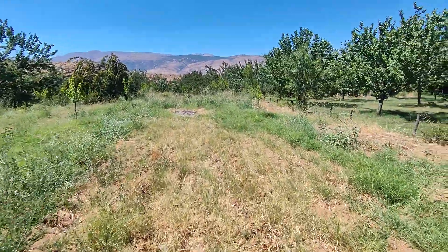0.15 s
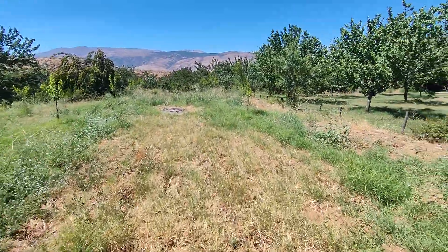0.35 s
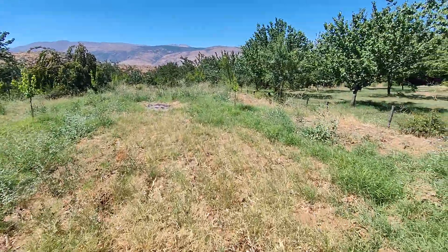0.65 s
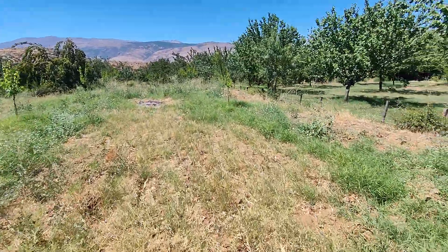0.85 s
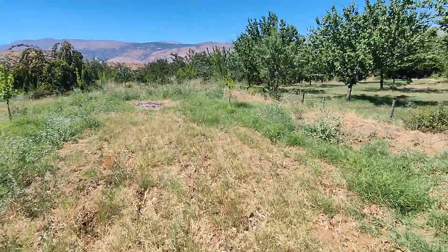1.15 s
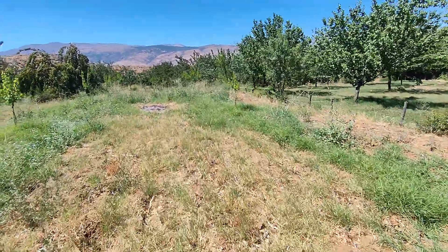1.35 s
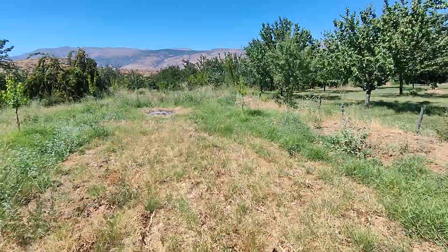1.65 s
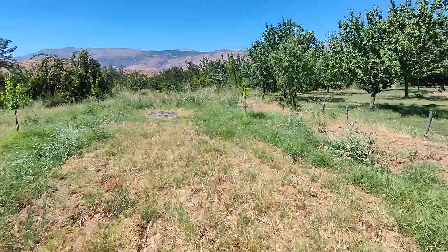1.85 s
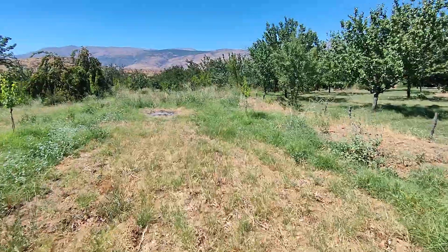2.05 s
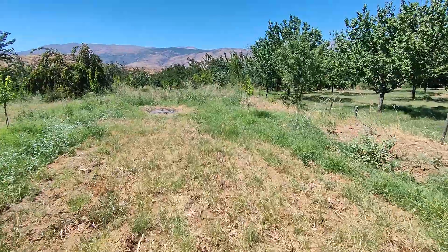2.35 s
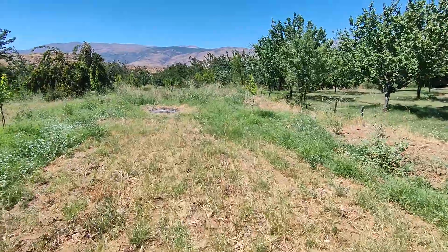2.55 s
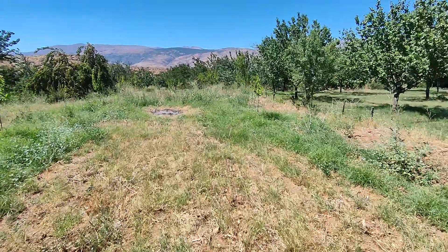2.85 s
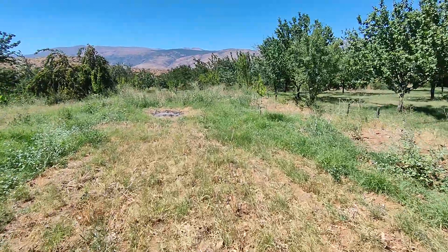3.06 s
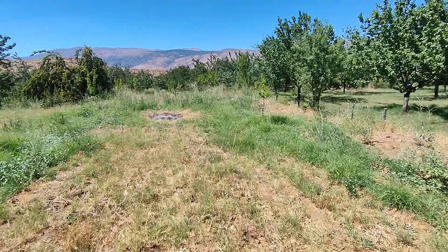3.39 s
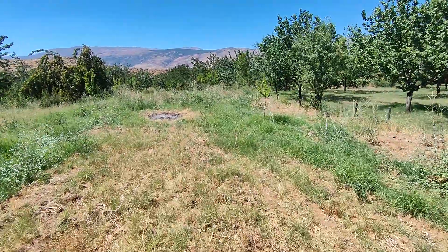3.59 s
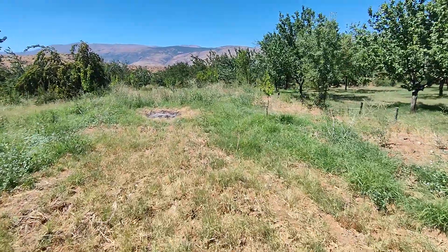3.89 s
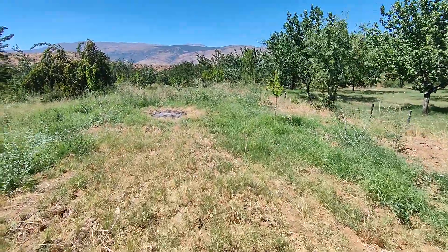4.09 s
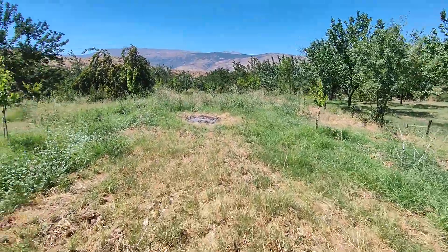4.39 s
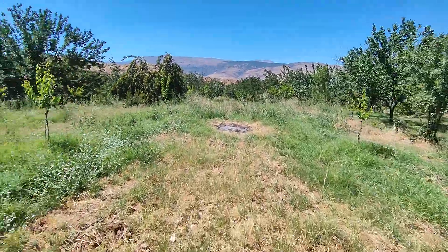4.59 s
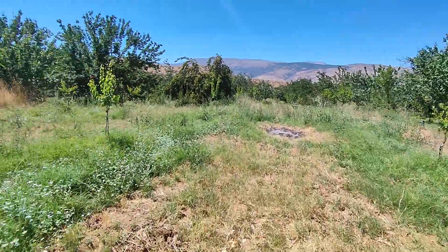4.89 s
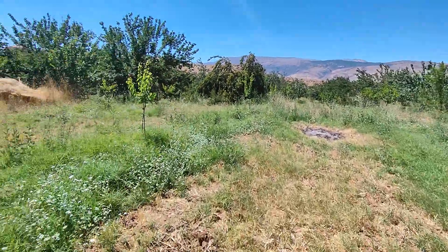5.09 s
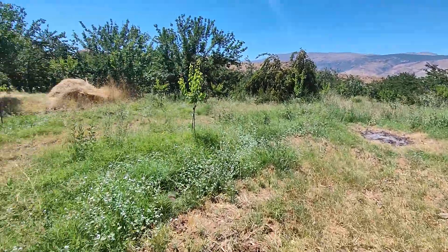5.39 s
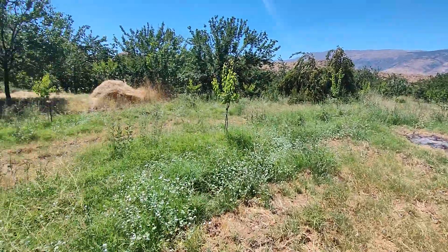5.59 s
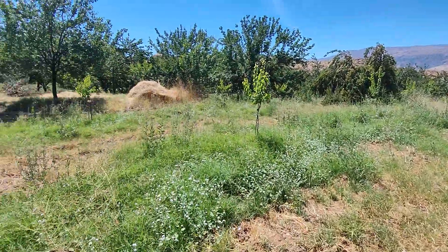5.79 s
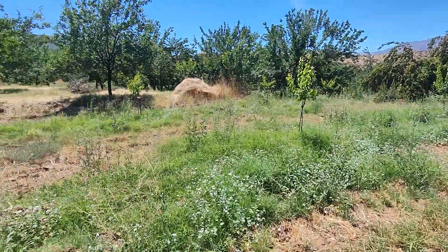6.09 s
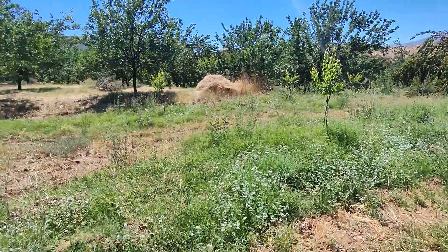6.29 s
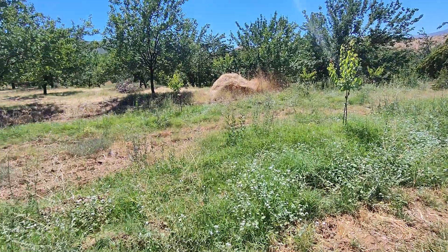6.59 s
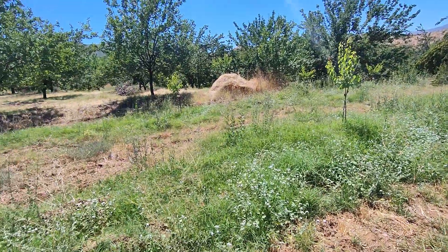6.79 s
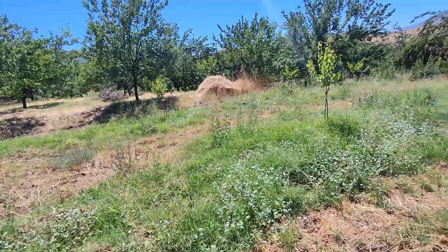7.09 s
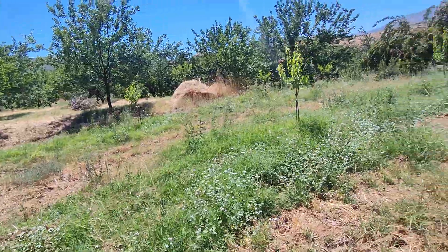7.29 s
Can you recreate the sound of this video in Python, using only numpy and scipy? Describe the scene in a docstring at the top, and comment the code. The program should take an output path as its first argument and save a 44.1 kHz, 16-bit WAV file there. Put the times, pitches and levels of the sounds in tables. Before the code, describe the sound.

Cicadas shrill densely across a summer orchard while slow steps crunch softly over dry mown grass and light breeze thumps the microphone, then walking stops.

```python
"""Cicadas shrill all around a summer orchard: fast click trains, smeared by leaves and rung by small bodies.
The nearer ones chirp about twelve times a second, drifting in and out of step.
Someone carrying a phone walks slowly over mown dry grass and stops; crowds of cracks make the steps,
damped swings the snapping stalks. A light breeze bumps the two microphone ports as low filtered noise,
over a faint open-air hush of noise, a faint wavering hum and one brief hollow tone gliding down."""
import sys
import numpy as np
from scipy import signal
from scipy.fft import rfft, irfft, next_fast_len
from scipy.io import wavfile
from scipy.ndimage import uniform_filter1d, map_coordinates

SR = 44100
rng = np.random.default_rng(int(sys.argv[2]) if len(sys.argv) > 2 else 0)


def wrap_up_sound(samples):
    """Save the sound to the file named by the first command line argument, as 16-bit audio."""
    columns = np.atleast_2d(samples).T
    # keep every value between -1 and 1, then stretch to whole-number steps
    tamed = np.clip(columns, -1, 1)
    steps = np.round(tamed * 32767).astype(np.int16)
    wavfile.write(sys.argv[1], SR, steps)


N = 328545
TIME = np.arange(N) / SR
TURN_S, TURN_LENGTH_S = 5.44, 0.9  # the walker slows, turns left and comes to rest


def undb(db):
    """Decibels to gain."""
    return 10 ** (np.asarray(db) / 20)


def unit(x):
    """Scale to an rms of one."""
    return x / np.sqrt(np.mean(x ** 2))


def pan(left_minus_right_db):
    """Gains of the two ports, as a column."""
    return undb(np.array([[left_minus_right_db], [-left_minus_right_db]]) / 2)


def colour(x, points):
    """Filter by a spectrum of (frequency [Hz], gain [dB]) points, straight over log frequency."""
    hz, db = np.transpose(points)
    size = next_fast_len(N)
    bin_hz = np.maximum(np.arange(size // 2 + 1) * SR / size, 1)
    gain = undb(np.interp(np.log(bin_hz), np.log(hz), db))
    return irfft(rfft(x, size) * gain, size)[..., :N]


def band(x, lo_hz, hi_hz, order=2):
    """Band-pass."""
    edges_hz = [lo_hz, min(hi_hz, SR / 2 - 1)]
    return signal.sosfilt(signal.butter(order, edges_hz, "band", fs=SR, output="sos"), x)


def walk(rate_hz):
    """Smooth random wander, rms one, from `rate_hz` random knots a second."""
    knots = rng.standard_normal(int(N / SR * rate_hz) + 2)
    line = np.interp(TIME * rate_hz, np.arange(len(knots)), knots)
    return unit(uniform_filter1d(line, int(SR / rate_hz / 2) + 1))


def swell(peak_s, length_s):
    """Smooth rise and fall around a moment; `length_s` is the width at half height."""
    return np.exp2(-(2 * (TIME - peak_s) / length_s) ** 2)


def turned():
    """Zero while walking ahead, one after turning and stopping."""
    return np.clip((TIME - TURN_S) / TURN_LENGTH_S + 0.5, 0, 1)


def cicada(click_hz, jitter, scatter_s):
    """Tymbal ribs buckle in a fast uneven train; moving leaves smear each click, differently at each port."""
    phase = np.cumsum(click_hz * (1 + jitter * walk(150))) / SR
    clicks = np.diff(np.floor(phase), prepend=0) ** 2
    already_singing = [click_hz * scatter_s / 2]
    decay = np.exp(-2 / (scatter_s * SR))
    energy, _ = signal.lfilter([1], [1, -decay], clicks + 1e-18, zi=already_singing)
    return unit(np.sqrt(energy) * rng.standard_normal((2, N)))


CHIRP_HZ = 12.25  # nearer cicadas, before drift
# bouts of chirping in step: (strongest chirp [s], length [s], throb depth [0-1])
STEP_BOUTS = [(0.568, .9, .5), (1.973, .4, 0.7), (2.51, .3, 0.6), (2.982, 0.39, 0.7), (4.708, .35, 0.93),
              (5.489, .8, 0.5), (6.817, .45, .55)]


def throb(stray, loose):
    """One cicada's chirping: loosely on its own beat, deeply on the shared beat during a bout."""
    drift = stray * walk(1.65)
    own_cycles = CHIRP_HZ * TIME + rng.random() + 0.5 * walk(1.5)
    power = 1 + loose * np.cos(2 * np.pi * own_cycles)
    for s, length_s, depth in STEP_BOUTS:
        shared_cycles = CHIRP_HZ * (TIME - s) + drift
        power = power + depth * swell(s, length_s) * np.cos(2 * np.pi * shared_cycles)
    return np.sqrt(np.maximum(power, 0))


def shimmer(x, width_hz=130, rate_hz=40, depth_db=1.3):
    """Paths through stirring foliage add and cancel, so narrow bands of the song flicker on their own."""
    f, t, z = signal.stft(x, SR, nperseg=512)
    chance = rng.standard_normal((2, int(f[-1] / width_hz) + 2, int(t[-1] * rate_hz) + 2))
    grid = np.meshgrid(f / width_hz, t * rate_hz, indexing="ij")
    flicker = np.array([map_coordinates(c, grid, order=1) for c in chance])
    return signal.istft(z * undb(depth_db * unit(flicker)), SR)[1][:, :N]


CHORUS_DB, TURNED_DB = -27, -0.55  # rms of the port mean; change once turned away
# relative song spectrum at the ports: (frequency [Hz], left [dB], right [dB])
SONG_SPECTRUM = [(2980, -40, -38.5), (3503, -34.5, -30), (3890, -25.8, -20), (4430, -14, -6),
                 (5060, -11.5, -3.5), (5730, -5, 0), (6610, -6.5, -6), (7200, -7.5, -6.5),
                 (7870, -12, -7.5), (8350, -12, -10.5), (9200, -15.5, -20.5), (11800, -14.5, -16.5),
                 (13070, -15.5, -19), (15500, -31.5, -32)]


def chorus(count=6, click_hz=400, low_hz=4400, high_hz=7200, loose=0.16, far_db=-3, stray=0.049,
           flutter_db=1.2):
    """Near cicadas throb together, each on its own body pitch; far ones blur into a wash."""
    near, far = 0, 0
    body_shape = [(0.65, -25), (0.82, 0.5), (1.2, -5.5), (1.5, -22)]  # (ratio to body_hz, [dB])
    for body_hz in np.geomspace(low_hz, high_hz, count):
        rasp = cicada(click_hz * rng.uniform(0.6, 1.4), 0.1, 0.0024)
        # the pumping abdomen swells notes near its resonance, leaves the bright edge steady
        body = colour(rasp, [(body_hz * ratio, db) for ratio, db in body_shape])
        chirps = throb(stray, loose)
        # fluttering leaves shade each port differently
        shade = undb(np.array([flutter_db * walk(70) for _ in range(2)]))
        near = near + rasp - body + body * unit(chirps * shade)
        far = far + cicada(click_hz * rng.uniform(0.6, 1.6), 0.2, 0.021)
    voices = shimmer(unit(near) + undb(far_db) * unit(far))
    spectrum = np.array(SONG_SPECTRUM)
    song = np.array([colour(voices[k], spectrum[:, [0, k + 1]]) for k in range(2)])
    # such small bodies radiate almost nothing low down
    song = signal.sosfilt(signal.butter(4, 2700, "high", fs=SR, output="sos"), song)
    return song / np.std(song.mean(axis=0)) * undb(CHORUS_DB + TURNED_DB * turned())


# relative density of the open-air hush: (frequency [Hz], density [dB per Hz])
HUSH_SPECTRUM = [(25, 0), (100, -13), (300, -10.5), (700, -13), (1500, -17), (3000, -19.5), (6000, -24)]


def hush(start_db=-55.0, end_db=-57):
    """Far air and foliage: partly shared noise, settling as the breeze drops."""
    air = rng.standard_normal((3, N))
    level = undb(np.linspace(start_db, end_db, N))
    return unit(colour(0.5 * air[0] + air[1:], HUSH_SPECTRUM)) * level * pan(-6.0)


def hum(centre_hz=420, waver=0.05, start_db=-67, fade_db_per_s=2):
    """A faint sine, wavering in pitch and level while it steadily fades."""
    phase = 2 * np.pi * np.cumsum(centre_hz * (1 + waver * walk(14))) / SR
    return np.sin(phase) * undb(start_db - fade_db_per_s * TIME + 3.5 * walk(9))


DRAUGHT_WALKING_DB, DRAUGHT_RESTING_DB = (-51, -54.5), (-56.5, -71)  # (left, right)
# gusts: (peak [s], length [s], level over both ports [dB], left minus right [dB])
GUST_TABLE = [(.01, .1, -40, -14), (0.134, .1, -35.5, 4), (0.278, 0.18, -33.5, -10), (0.582, .18, -42, 8),
              (0.874, 0.15, -38, 13), (1.28, 0.23, -48, -12), (1.54, 0.14, -38.5, 20),
              (1.825, 0.35, -41.5, 20), (2.2, 0.17, -41, 4), (2.43, 0.11, -37, -8),
              (2.577, 0.053, -38, -10), (3.215, 0.13, -43, 14), (3.69, 0.24, -35.5, 20),
              (4.0, 0.074, -33.5, 15), (4.196, .14, -37, 1.5), (4.42, 0.1, -36.5, 9),
              (4.73, 0.18, -36.5, 8), (5.132, .08, -47, 7), (5.342, 0.11, -44, 16), (6.62, 0.19, -48.5, 20)]


def wind_strength():
    """Wind on each port: a draught that drops when the walker stops, and gusts from either side."""
    draughts = zip(DRAUGHT_WALKING_DB, DRAUGHT_RESTING_DB)
    power = np.array([undb(moving + (still - moving) * turned()) ** 2 for moving, still in draughts])
    for s, length_s, db, left_minus_right_db in GUST_TABLE:
        sides = pan(left_minus_right_db)
        power = power + (undb(db) * sides / np.linalg.norm(sides)) ** 2 * swell(s, length_s)
    return np.sqrt(power)


# single eddies on the windward port: (time [s], peak [dB], pitch [Hz])
EDDY_THUMPS = [(0.169, -23, 115), (0.614, -25, 119), (0.867, -28, 104), (1.925, -28.5, 107),
               (2.578, -29, 130), (3.215, -24.5, 135), (3.64, -24, 116), (3.694, -24.5, 90),
               (3.7288, -13.5, 148), (3.7721, -11, 168), (3.984, -26.5, 110), (4.377, -28, 120),
               (4.424, -15, 128), (5.309, -29.5, 79.4)]


def breeze(gust_db=5.0, eddy_db=3, gust_s=0.27):
    """Turbulence rumbles in lumps on each port separately; some eddies land as single soft thumps."""
    # (frequency [Hz], gain [dB])
    rumble = [(15, -3.5), (35, 4), (115, 0), (200, -17), (320, -28.5), (600, -37), (2000, -68)]
    lumps = np.array([colour(rng.standard_normal(N), rumble)
                      * undb(gust_db * walk(20) + eddy_db * walk(60)) for _ in range(2)])
    strength = wind_strength()
    # the lumps share out the strength of each gust
    running_rms = np.sqrt(uniform_filter1d(lumps ** 2, int(gust_s * SR)))
    ports = lumps / running_rms * strength
    for s, db, hz in EDDY_THUMPS:
        cycles = (TIME - s) * hz
        close = np.abs(cycles) < 3
        windward = np.argmax(strength[:, int(s * SR)])
        # suction, a narrow pressure peak, suction again
        u = (2.1 * cycles[close]) ** 2
        ports[windward, close] += undb(db) * (1 - 5 * u) / (1 + u) ** 4
    return ports


# relative density of crushed straw: (frequency [Hz], density [dB per Hz])
STRAW_SPECTRUM = [(100, -17), (400, -1), (750, -0.5), (1200, -4.5), (1800, -4.5), (3000, -9.5), (8000, -5),
                  (15000, -11.5)]
# footsteps: (full weight [s], level [dB], rise [s], fall [s], dull ground thud [dB])
FOOTFALLS = [(.24, -51.5, .07, 0.051, -56), (1.112, -44, 0.05, .04, -70), (1.65, -51.5, 0.039, 0.08, -70),
             (2.495, -44, .11, 0.029, -53), (3.175, -47, 0.073, 0.073, -66), (3.87, -47, 0.025, 0.039, -66),
             (4.55, -48, 0.073, 0.037, -70), (5.038, -44, 0.014, 0.033, -60),
             (5.656, -45, .008, 0.015, -64)]


def footsteps(grains_per_s=2800, grain_db=3.3, crumple_db=2.5, thud_lo_hz=310, thud_hi_hz=470):
    """Soles crush dry grass: tiny cracks swell with the weight and die away, over a dull thud."""
    weight, press = 0, 0
    for s, db, rise_s, fall_s, thud_db in FOOTFALLS:
        load = np.exp(-np.maximum((s - TIME) / rise_s, (TIME - s) / fall_s))
        weight = weight + undb(db) * load
        press = press + undb(thud_db) * load
    # stems brush the shoes, faintest once the walk ends
    brush_db = np.interp(TIME, [0, 1.2, 1.4, 5.3, 6.2], [-54.5, -52.5, -63, -59, -67.5])
    weight = weight + undb(brush_db)
    hits = rng.random((3, N)) < grains_per_s / SR
    sizes = rng.standard_normal((3, N)) * undb(grain_db * rng.standard_normal((3, N)))
    cracks = hits * sizes
    # half of the crackle reaches both ports alike
    straw = colour(cracks[0] + cracks[1:], STRAW_SPECTRUM)
    ground = unit(band(rng.standard_normal(N), thud_lo_hz, thud_hi_hz)) * press
    # tufts give way one after another
    return unit(straw * undb(crumple_db * walk(120))) * weight + ground


# stalks and twigs snapping: (time [s], peak before panning [dB], pitch [Hz], upper edge [Hz])
STALK_SNAPS = [(.19, -50, 1200, 2500), (.236, -40, 700, 2500), (1.052, -37, 1400, 2200),
               (1.166, -29, 583, 2650), (1.2254, -25, 1150, 2010), (3.225, -39, 1700, 2200),
               (3.866, -38, 850, 1400), (4.033, -30, 7000, 13000), (4.487, -42, 800, 1600),
               (4.543, -41, 850, 1500), (4.561, -42, 1050, 1600), (4.867, -33, 7000, 10900),
               (5.028, -37, 694, 2000), (5.145, -32, 7500, 13000), (5.219, -46, 900, 1200),
               (5.657, -40, 700, 2000), (7.09, -44, 700, 1500)]


def snaps(cycles=0.47, port_lag_s=0.00009):
    """A breaking stalk swings once, sharply damped and dulled by grass; the right port hears it first."""
    out, t = np.zeros(N), TIME[:SR // 20]
    for s, db, hz, edge_hz in STALK_SNAPS:
        swing = np.cos(2 * np.pi * hz * t) * np.exp(-t * hz / cycles)
        ring = band(swing, hz / 4, edge_hz, order=5)
        at = int(s * SR)
        out[at:at + len(t)] += undb(db) * ring / np.abs(ring).max()
    return np.array([np.interp(TIME - port_lag_s, TIME, out), out]) * pan(-1.0)


DRONE_S, DRONE_LENGTH_S, DRONE_EDGE_S = 0.522, 0.1, 0.018  # start, length, swell and fade
DRONE_HZ, DRONE_SAG_HZ_PER_S, DRONE_DB = 153.5, 536, -39  # start pitch, glide, rms before panning


def drone(second_db=-22, third_db=-13):
    """A brief hollow low tone, mostly first and third harmonic, gliding down."""
    age_s = np.clip(TIME - DRONE_S, 0, DRONE_LENGTH_S)
    phase = 2 * np.pi * np.cumsum(DRONE_HZ - DRONE_SAG_HZ_PER_S * age_s) / SR
    tone = np.sin(phase) + undb(second_db) * np.sin(2 * phase) + undb(third_db) * np.sin(3 * phase)
    envelope = np.minimum(np.minimum(age_s, DRONE_LENGTH_S - age_s) / DRONE_EDGE_S, 1)
    return unit(tone) * undb(DRONE_DB) * envelope * pan(3.4)


def scene():
    """The orchard as the two ports hear it."""
    return chorus() + hush() + hum() + breeze() + footsteps() + snaps() + drone()


TOP_HZ = 15700


def record(dry):
    """The phone cuts the top: a steep elliptic low-pass."""
    return signal.sosfilt(signal.ellip(12, 0.1, 85, TOP_HZ, fs=SR, output="sos"), dry)


dry = scene()
out = record(dry)
wrap_up_sound(out)
```